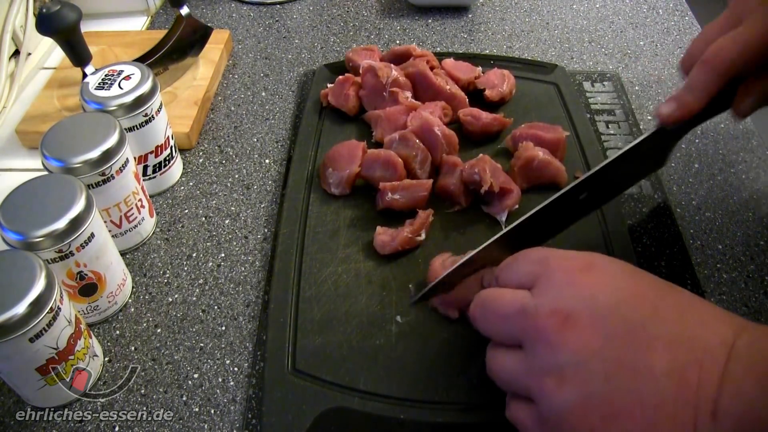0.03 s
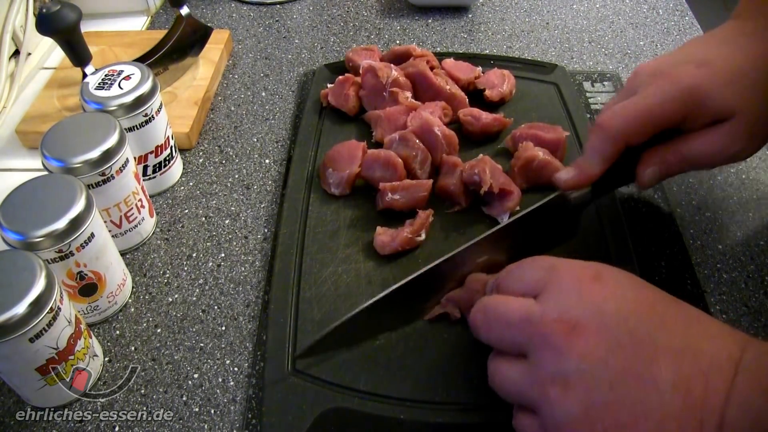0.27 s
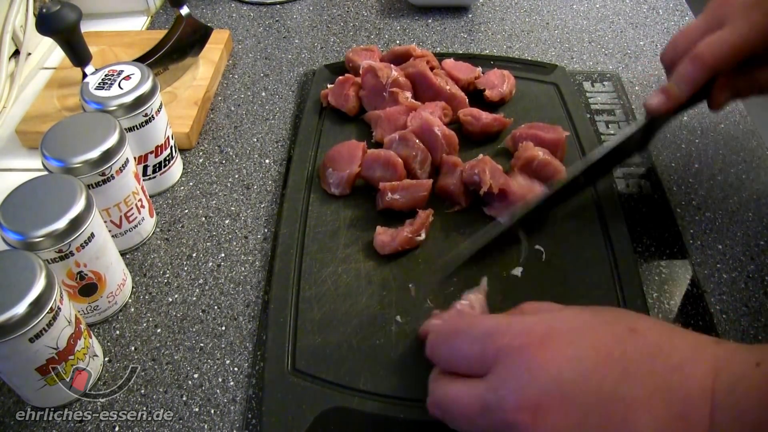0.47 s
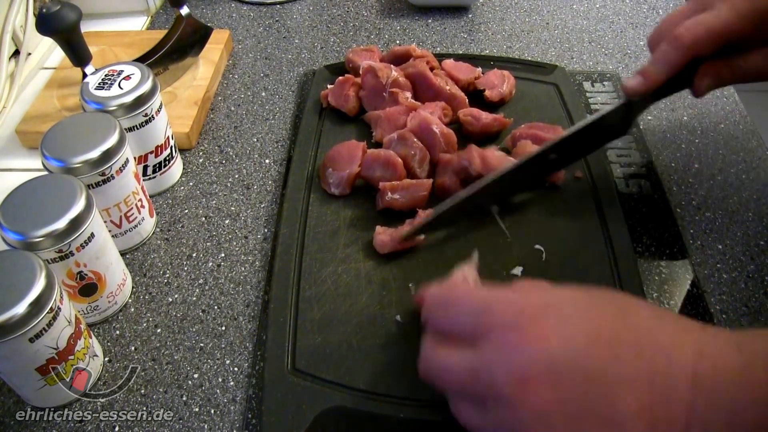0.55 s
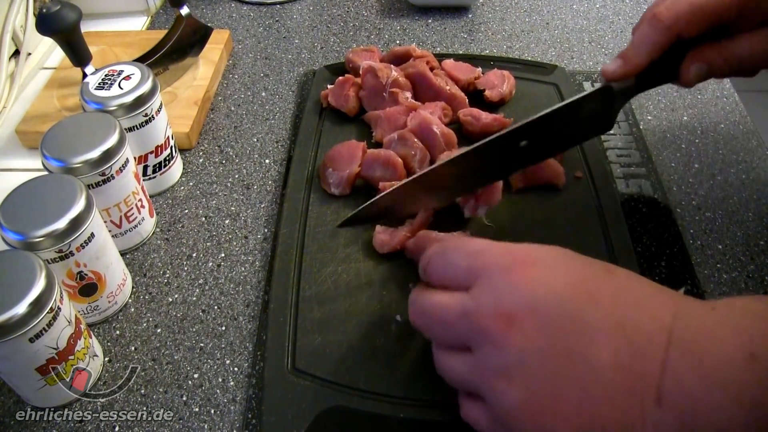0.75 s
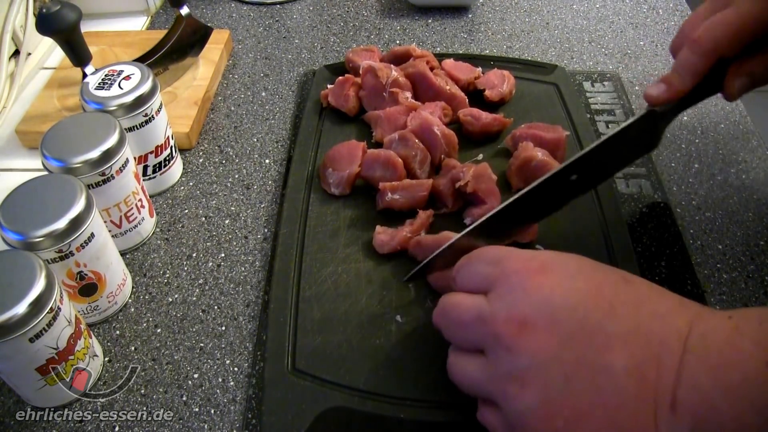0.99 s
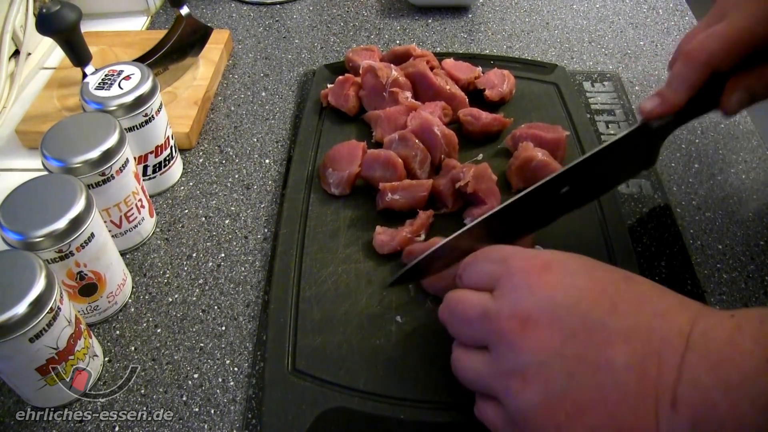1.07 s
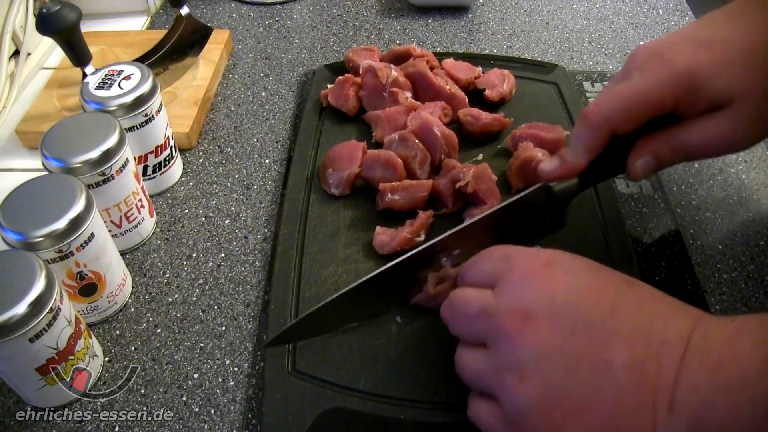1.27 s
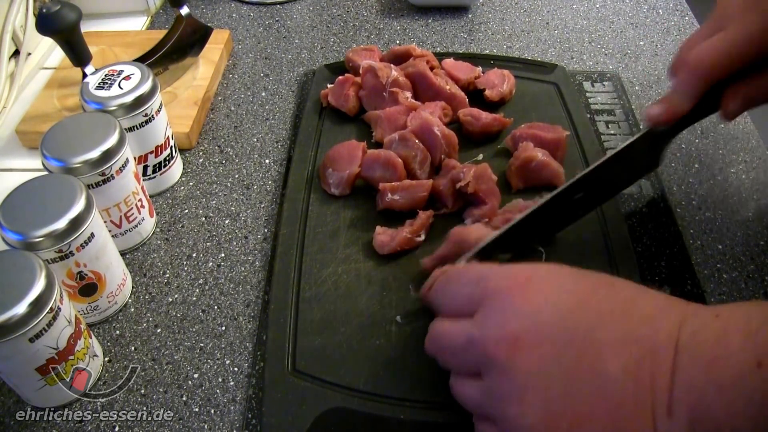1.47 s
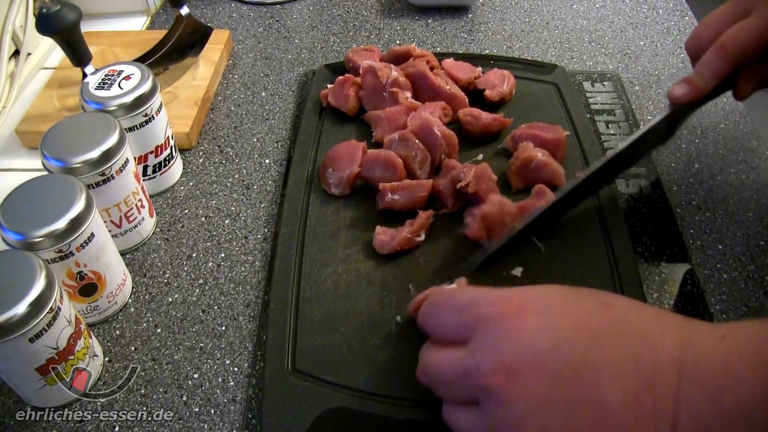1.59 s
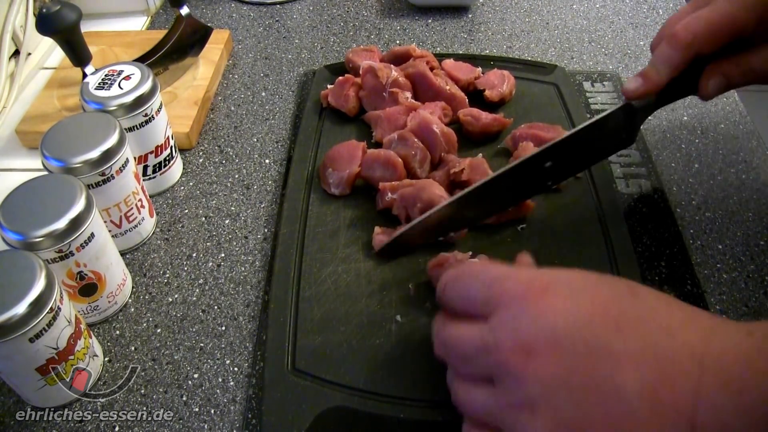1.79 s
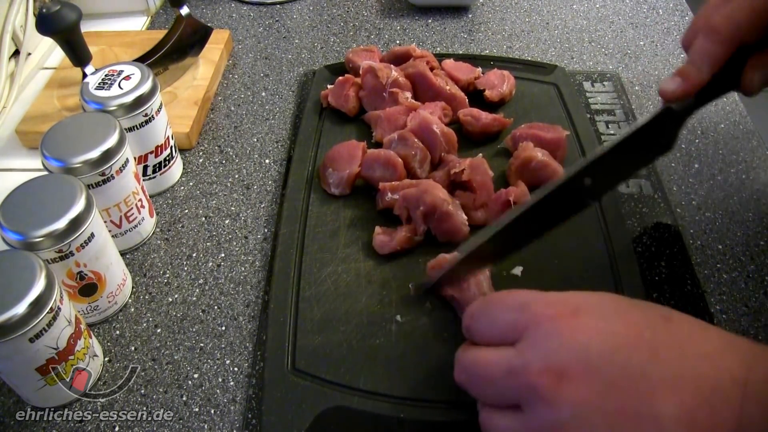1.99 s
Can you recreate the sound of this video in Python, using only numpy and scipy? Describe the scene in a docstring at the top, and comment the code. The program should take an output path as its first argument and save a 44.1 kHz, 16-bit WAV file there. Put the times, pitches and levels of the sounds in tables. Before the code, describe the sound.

Close by and slightly left, a knife squelches through meat and knocks the board, then scrapes aside and flicks off. After a short pause it repeats, over faint hiss with short kitchen reverberation.

```python
"""A steel kitchen knife cuts raw meat on a plastic board, twice, close to a stereo pair in a hard kitchen.
Each time the edge squelches through, knocks and slides: clumped clicks drive the board's resonances.
The blade then scrapes the piece aside and flicks off: clicks also drive a gliding rasp and ringing steel.
Ticks of sticky meat are short noise bursts; a thin whistle of wavering sines passes at the end.
Noise echoes give the room, and a quiet room and microphone hiss lies below."""
import sys
import numpy as np
from scipy import signal
from scipy.fft import rfft, irfft
from scipy.io import wavfile

SR = 44100
rng = np.random.default_rng(int(sys.argv[2]) if len(sys.argv) > 2 else 0)


def volts_from_decibels(level):
    """Turn decibel levels (scalar or array-like) into linear amplitude factors."""
    exponent = np.asarray(level, float) / 20
    return 10 ** exponent


def unload_wav(signal):
    """Save mono or channel-first audio to the path in sys.argv[1] as 16-bit WAV at rate SR, clipped to [-1, 1]."""
    wavfile.write(
        sys.argv[1],
        SR,
        np.round(np.clip(np.atleast_2d(signal).T, -1, 1) * 32767).astype(np.int16),
    )


N = 90404  # length in samples
GRAINS_PER_S = 5000  # clicks of the edge or blade against the board

# blade scraping the piece aside, one list a stroke: [t/s, level/dB, treble level/dB,
# steel ring against level/dB, rasp against level/dB, rasp f/Hz]
SWEEPS = [
    [(.35, -47, -53, -11, -20, 1300), (.382, -42, -44, -7, -1, 1240), (.424, -30, -34.5, -10, 3, 1213),
     (.45, -28.5, -34.5, -5, -7.5, 1270), (.478, -27, -33, -19, -6, 1305), (.52, -31, -34.5, 2.5, 2, 1180),
     (.538, -36.5, -39, 13.5, 7, 1060), (.55, -24.5, -34, 7.5, -3.5, 1200), (.572, -21, -30.5, -1, 5, 1400),
     (.59, -29.5, -30.5, 5.5, -9, 1470), (.64, -39, -47, -32, -27, 1470), (.74, -47, -64, -39, -25, 1450)],
    [(1.42, -41.5, -58, -2, -29, 1230), (1.49, -41, -40, -25, -7, 1140),
     (1.502, -26, -38, -13.5, -21, 1290), (1.528, -44, -40.5, -12, 10, 1250),
     (1.545, -30, -37, -7, -3.5, 1285), (1.59, -37.5, -36, -24, 4.5, 1220),
     (1.602, -30.5, -33, -13, 0, 1280), (1.64, -30.5, -41.5, -0.5, -4, 1040),
     (1.68, -37.5, -44.5, -40, -1, 890), (1.694, -32, -37, 16, 4, 1140),
     (1.708, -24.5, -27.5, 1.5, -13, 1140), (1.74, -29.5, -37.5, -3, 5.5, 1100),
     (1.775, -34.5, -39.5, -14.5, -31, 1210), (1.82, -41.5, -57.5, -9, -54, 1185),
     (2.05, -63, -57, 7, -21, 1200)],
]
# resonances of the board under the edge: [f/Hz, width/Hz, level/dB]
BOARD_CUT = [(546, 35, -2), (1290, 90, -2), (1485, 55, -5), (1835, 45, 1), (1995, 40, 0), (2310, 50, -8),
             (2865, 110, -5), (3320, 70, -9), (3830, 80, -10)]
# broad colour of the board under the edge: [f/Hz, relative level/dB]
CUT_BODY = [(35, -41), (60, -8.5), (211, -9), (451, -15), (543, -0.5), (800, -1.5), (1400, 5.5), (1620, -8),
            (2000, -2.5), (4000, -16), (6500, -46.5), (11000, -120)]


def rms_one(x):
    """Scale to unit rms."""
    return x / np.sqrt(np.mean(x ** 2) + 1e-20)


def in_time(strokes, columns):
    """Gain over time from the summed dB columns of each stroke; silent between strokes."""
    t, gain = np.arange(N) / SR, np.zeros(N)
    for rows in strokes:
        rows = np.array(rows)
        times = rows[:, 0]
        fade = np.clip(np.minimum(t - times[0], times[-1] - t) / .015, 0, 1)  # 15 ms at each end
        level_db = sum(np.interp(t, times, rows[:, c]) for c in columns)
        gain += fade * volts_from_decibels(level_db)
    return gain


def at_hz(points, hz):
    """Read a table on a log-frequency axis."""
    table_hz, value = np.transpose(points)
    return np.interp(np.log(hz), np.log(table_hz), value)


def colour(x, spectrum):
    """Causal (minimum-phase) filter with the given spectrum and unit noise gain."""
    size = 2 ** 11
    hz = np.maximum(np.arange(size // 2 + 1) * SR / size, 1)
    cepstrum = irfft(at_hz(spectrum, hz) * np.log(10) / 20)
    # folding the cepstrum onto positive time makes the phase minimum
    cepstrum[1:size // 2] *= 2
    cepstrum[size // 2 + 1:] = 0
    h = irfft(np.exp(rfft(cepstrum)))
    return signal.fftconvolve(x, h / np.sqrt(np.sum(h ** 2)))[:N]


def butter(x, order, hz, kind="low"):
    """Butterworth filter."""
    return signal.sosfilt(signal.butter(order, hz, kind, fs=SR, output="sos"), x)


def ring(x, hz, t60):
    """A two-pole resonator: a unit click starts a dying sine of height 1."""
    r, w = volts_from_decibels(-60 / (t60 * SR)), 2 * np.pi * hz / SR
    return signal.lfilter([0, np.sin(w)], [1, -2 * r * np.cos(w), r * r], x + 1e-18)


def modes(x, table):
    """Parallel ringing modes (Hz, dB, t60 in s) of alternating sign, scaled for unit noise gain."""
    energy = sum(volts_from_decibels(2 * db) * t60 * SR / (12 * np.log(10)) for _, db, t60 in table)
    total = sum(volts_from_decibels(db) * ring(x, hz, t60) * (-1) ** k for k, (hz, db, t60) in enumerate(table))
    return total / np.sqrt(energy)


def board(x, peaks, body, peaks_db):
    """The board answers with a broad colour plus resonances; wider ones die sooner."""
    table = []
    for hz, width, db in peaks:
        t60 = np.log(1000) / (np.pi * width)
        table.append((hz, db + 20 * np.log10(width), t60))
    return colour(x, body) + volts_from_decibels(peaks_db) * modes(x, table)


def grains(rate_hz):
    """Dense uneven stick-slip clicks whose strength swells in clumps."""
    chatter_hz, chatter_db, spread_db = 80, 1.2, 2.5
    r = np.exp(-2 * np.pi * chatter_hz / SR)
    clump = rms_one(signal.lfilter([1], [1, -2 * r, r * r], rng.standard_normal(N)))
    uneven = np.minimum(rng.exponential(1, N), 4)
    size = volts_from_decibels(spread_db * uneven + chatter_db * clump)
    happens = rng.random(N) < rate_hz / SR
    return rms_one(size * rng.choice([-1, 1], N) * happens)


def cuts():
    """The edge pushes through the meat and slides: clicks drive the board, a low thud and a wet hiss."""
    # edge in the meat and on the board, one list a stroke:
    # [t/s, level/dB, wet hiss level/dB, board thud level/dB]
    strokes = [
        [(0, -103, -69, -66), (.1, -51.5, -57.5, -48), (.14, -53, -56.5, -49.5), (.2, -43, -45, -42),
         (.234, -34.5, -41, -39), (.2365, -22, -39, -26), (.252, -23, -34.5, -41), (.282, -24, -40.5, -49),
         (.35, -42, -52.5, -50), (.38, -40, -55, -52)],
        [(1.19, -93, -62, -81), (1.24, -47, -51.5, -75), (1.243, -58, -43, -60), (1.27, -44.5, -46, -48),
         (1.3065, -39, -46, -39), (1.309, -21.5, -35, -40), (1.328, -31, -39.5, -36.5),
         (1.36, -34.5, -47, -50.5), (1.41, -43, -69, -52), (1.44, -42, -68, -57)],
    ]
    # broad colour of the thud: [f/Hz, relative level/dB]
    thud_colour = [(40, -39), (90, -16.5), (150, -4.5), (300, -13.5), (600, -1.5), (900, -29.5),
                   (3000, -62)]
    # broad colour of the wet hiss: [f/Hz, relative level/dB]
    wet_colour = [(1650, -6), (2800, -38), (4040, 1.5), (5420, -2.5), (5740, -5.5), (9920, -8),
                  (15600, -24)]
    edge = grains(GRAINS_PER_S) * in_time(strokes, [1])
    body = board(edge, BOARD_CUT, CUT_BODY, peaks_db=-3.0)
    thud = colour(grains(GRAINS_PER_S) * in_time(strokes, [3]), thud_colour)
    wet = colour(grains(rate_hz=17000) * in_time(strokes, [2]), wet_colour)
    return body + thud + wet


def sweeps():
    """The blade scrapes sideways: the same clicks drive board, rasp, thump and steel, under a treble hiss."""
    # resonances of the board under the scraping blade: [f/Hz, width/Hz, level/dB]
    scrape_peaks = [(548, 40, 2), (641, 40, -5), (1465, 40, -6)]
    # broad colour of the board under the scraping blade: [f/Hz, relative level/dB]
    scrape_body = [(47, -64.5), (150, -41.5), (400, -13), (546, 3), (785, -10), (1150, -5.5), (2600, -13),
                   (5000, -18), (6500, -50), (11000, -120)]
    # broad colour of the scrape's treble: [f/Hz, relative level/dB]
    treble_colour = [(1650, -16.5), (2800, -7), (3980, -7), (4800, -12.5), (7440, -13), (13600, -25.5),
                     (15600, -40)]
    slip = grains(GRAINS_PER_S)
    body = board(slip * in_time(SWEEPS, [1]), scrape_peaks, scrape_body, peaks_db=-2.5)
    treble = colour(grains(rate_hz=9700) * in_time(SWEEPS, [2]), treble_colour)
    return body + rasp(slip) + flick_thump(slip) + blade_ring(slip) + treble


def rasp(slip):
    """A resonance of the bent blade that glides with the stroke."""
    x = slip * in_time(SWEEPS, [1, 4])
    s, hz = np.array(SWEEPS[0] + SWEEPS[1])[:, [0, 5]].T
    width_hz = 90
    r = np.exp(-np.pi * width_hz / SR)
    out, state = np.zeros(N), np.zeros(2)
    for i in range(0, N, 128):  # the pitch moves on every 128 samples
        w = 2 * np.pi * np.interp(i / SR, s, hz) / SR
        poles = [1, -2 * r * np.cos(w), r * r]
        out[i:i + 128], state = signal.lfilter([1, 0, -1], poles, x[i:i + 128] + 1e-18, zi=state)
    return out * np.sqrt((1 - r * r) / 2)


def flick_thump(slip):
    """Hollow thump of the board as the blade leaves it, following the steel's ring level."""
    # broad colour of the thump: [f/Hz, relative level/dB]
    thump_colour = [(60, -31.5), (120, -21), (250, -15), (430, 0), (700, -2), (820, -16), (3000, -51.5)]
    return volts_from_decibels(-5) * colour(slip * in_time(SWEEPS, [1, 3]), thump_colour)


def blade_ring(slip):
    """The steel rings in fixed modes, balanced anew for each stroke."""
    # modes of the blade: [f/Hz]
    mode_hz = [311, 548, 645, 921, 996, 1473, 1729, 2070, 2349, 3137, 3268, 3967, 5226, 5430, 6223, 7400,
               8660]
    # for each mode: [t60/s, level in first stroke/dB, level in second stroke/dB]
    mode_levels = [(.35, -25, -11), (.14, 5, 4), (.08, -7, 0), (.3, -20, -7), (.17, -2, -14), (.09, 0, -8),
                   (.28, -10, -16), (.2, -13, -20), (.28, -6, -9), (.25, -35, -7), (.1, -7, -9),
                   (.09, -25, -4), (.11, -9, -26), (.08, -22, -9), (.25, -24, -15), (.1, -14, -12),
                   (.15, -21, -21)]
    steel = np.zeros(N)
    for k, rows in enumerate(SWEEPS):
        table = [(hz, db[k], t60) for hz, (t60, *db) in zip(mode_hz, mode_levels)]
        steel += modes(slip * in_time([rows], [1, 3]), table)
    return steel


def knocks():
    """Edge knocks: single clicks, softened by a low-pass, set the board ringing."""
    # knocks on the board: [t/s, drive level/dB]
    hits = [(0.112, -24), (0.2357, -13.5), (0.269, -11.5), (1.2985, -22), (1.308, -7), (1.497, -34),
            (1.542, -16), (1.599, -22), (1.69, -10), (1.707, -6.5)]
    clicks = np.zeros(N)
    for s, db in hits:
        clicks[int(s * SR)] = volts_from_decibels(db)
    soft = butter(clicks, 2, 3020)
    return volts_from_decibels(6) * board(soft, BOARD_CUT, CUT_BODY, peaks_db=-16)


def ticks():
    """Sticky meat letting go: each tick is a dying noise burst in a band just below its table pitch."""
    # sticky ticks: [t/s, drive level/dB, f/Hz]
    releases = [(0.756, -32, 12700), (0.947, -40, 7840), (1.168, -32.5, 6640), (1.212, -35.5, 9450),
                (1.241, -20, 4700), (1.247, -21, 4600)]
    out, t = np.zeros(N), np.arange(N) / SR
    for s, db, hz in releases:
        age = np.clip(t - s, 0, 1)
        decay = np.exp(-age * hz / 20)  # falls to 1/e in 20 cycles
        burst = rng.standard_normal(N) * (t >= s) * decay
        out += volts_from_decibels(db) * butter(burst + 1e-18, 1, [hz / 1.12, hz * 0.99], "band")
    return out


def whistle():
    """One thin high sine that wavers, rises and drops away, with two short fainter companions."""
    # main line: [t/s, f/Hz, rms level/dB]
    line = [(1.845, 12500, -80), (1.879, 13100, -66), (1.904, 12590, -70), (1.945, 13230, -68),
            (1.972, 13330, -71), (1.992, 13800, -65), (2.012, 13200, -67), (2.04, 11850, -76)]
    # fainter lines beside it: [start t/s, end t/s, pitch ratio, level against main line/dB]
    companions = [(1.92, 1.985, .83, -3), (1.975, 2.015, .945, -2)]
    t, (s, hz, db) = np.arange(N) / SR, np.transpose(line)
    phase = 2 * np.pi * np.cumsum(np.interp(t, s, hz)) / SR
    lines = np.sin(phase)
    for start, end, ratio, side_db in companions:
        fade = np.clip(np.minimum(t - start, end - t) * 100, 0, 1)  # 10 ms
        lines = lines + volts_from_decibels(side_db) * fade * np.sin(ratio * phase)
    sounding = (t > s[0]) * (t < s[-1])
    return np.sqrt(2) * volts_from_decibels(np.interp(t, s, db)) * sounding * lines


def pair(a, b, alike):
    """Left and right from a shared and an opposed part; alike is their correlation."""
    shared, opposed = np.sqrt(1 + alike) * a, np.sqrt(1 - alike) * b
    return np.array([shared + opposed, shared - opposed]) / np.sqrt(2)


def kitchen(x):
    """Side reflections, opposed in left and right, and a diffuse tail that dies band by band."""
    # decay of the kitchen: [f/Hz, t60/s]
    decay_times = [(100, 0.14), (400, 0.82), (1500, 0.53), (4000, 0.57), (12000, 0.39)]
    tail_db, early_db, tail_alike = -9.5, -6, 0.67  # energy per channel against the direct sound
    t = np.arange(SR) / SR
    white, tail = rng.standard_normal((2, SR)), 0
    edges = 60 * 2 ** np.arange(9)  # octaves from 60 Hz
    for low, high in zip(edges, edges[1:]):
        band = butter(white, 2, [low, high], "band")
        t60 = at_hz(decay_times, np.sqrt(low * high))
        tail = tail + band * volts_from_decibels(-60 * t / t60) * np.clip(t / 0.0064, 0, 1)  # builds up in 6.4 ms
    early = rng.standard_normal(SR) * np.exp(-t / 0.0019) * [[1], [-1]]
    h = volts_from_decibels(tail_db) * pair(*tail, tail_alike) / np.sqrt(np.sum(tail ** 2) / 2)
    h = h + volts_from_decibels(early_db) * early / np.sqrt(np.sum(early ** 2) / 2)
    return signal.fftconvolve(x[None], h, axes=1)[:, :N]


def hiss():
    """Room and microphone noise: coloured noise, partly alike in left and right."""
    # broad colour of the hiss: [f/Hz, relative level/dB]
    hiss_colour = [(18, -44), (40, -21.5), (237, -2), (640, -2), (800, -8.5), (1170, -4), (1520, -12),
                   (2770, -12.5), (15600, -25)]
    # how the hiss drifts: [t/s, level/dB]
    drift = [(0, -51), (.9, -50), (1.04, -57), (1.2, -54.5), (1.45, -51.5)]
    a, b = (colour(rng.standard_normal(N), hiss_colour) for _ in range(2))
    s, db = np.transpose(drift)
    return volts_from_decibels(np.interp(np.arange(N) / SR, s, db)) * pair(a, b, alike=0.44)


def scene():
    """Knife and board near the microphones, a little to the left, with the bass leaning further left."""
    near = butter(cuts() + sweeps() + knocks() + ticks(), 2, 87.5, "high")  # microphone's low limit
    pan_db = 2.25  # left over right
    direct = near * volts_from_decibels(np.array([[.5], [-.5]]) * pan_db)
    bass = volts_from_decibels(-11.0) * butter(near, 1, 200)
    bass_lean = bass * [[1], [-1]]  # added on the left, taken away on the right
    return direct + bass_lean + kitchen(near) + hiss() + whistle()


def roll_off(x):
    """The treble ends steeply here."""
    return signal.sosfilt(signal.butter(12, 15750, fs=SR, output="sos"), x)


def record(dry):
    """The finished stereo mix as it is stored."""
    return roll_off(dry)


dry = scene()
out = record(dry)
unload_wav(out)
```